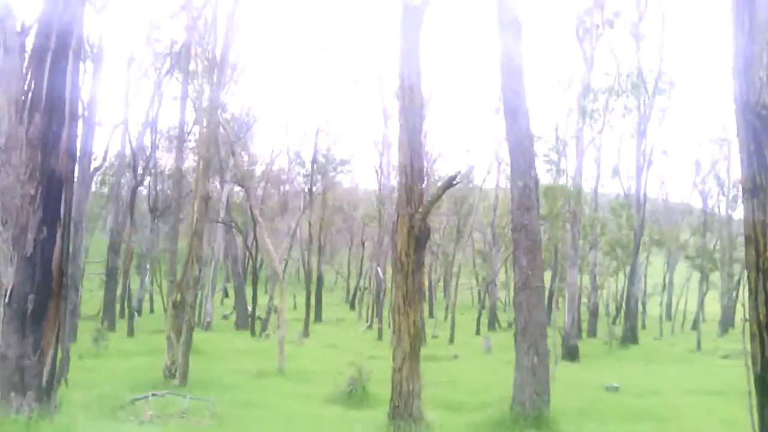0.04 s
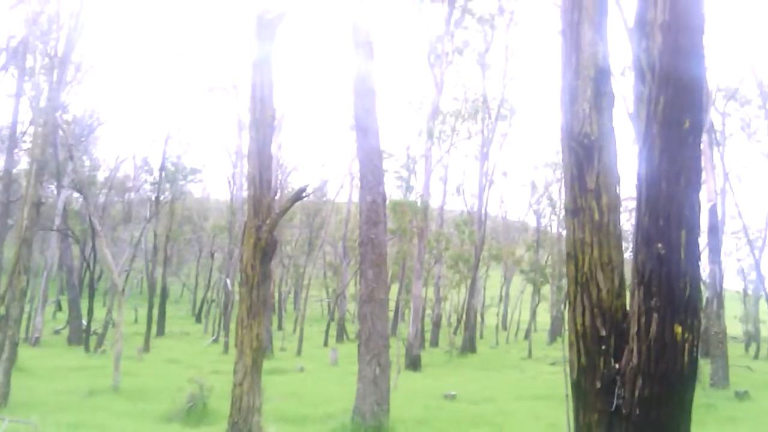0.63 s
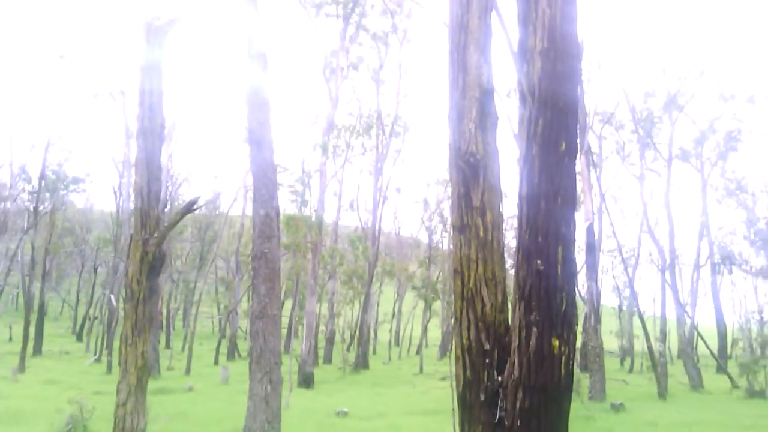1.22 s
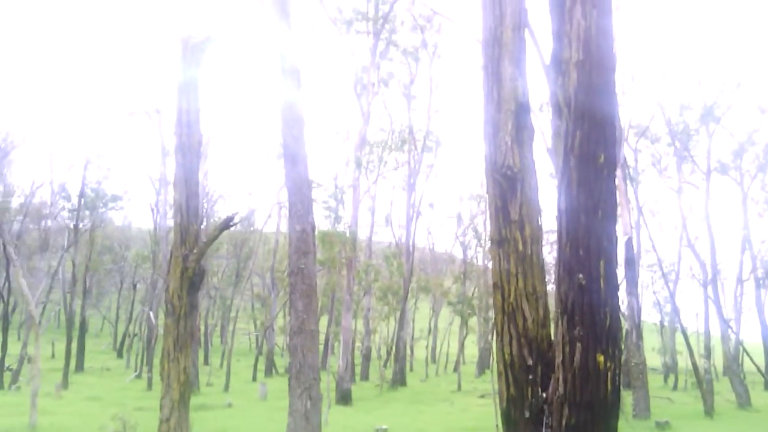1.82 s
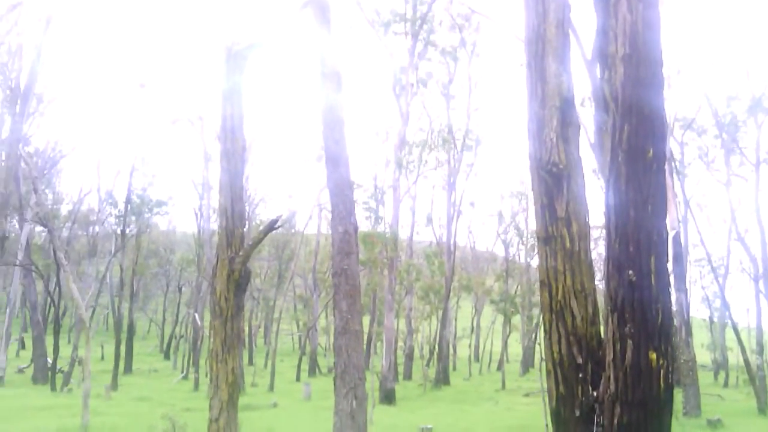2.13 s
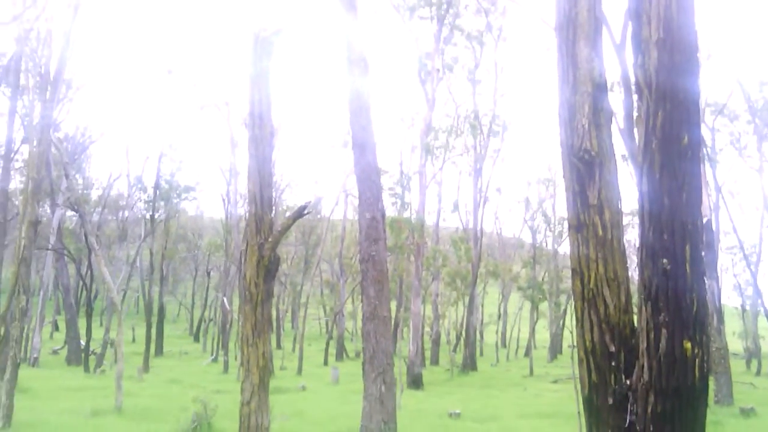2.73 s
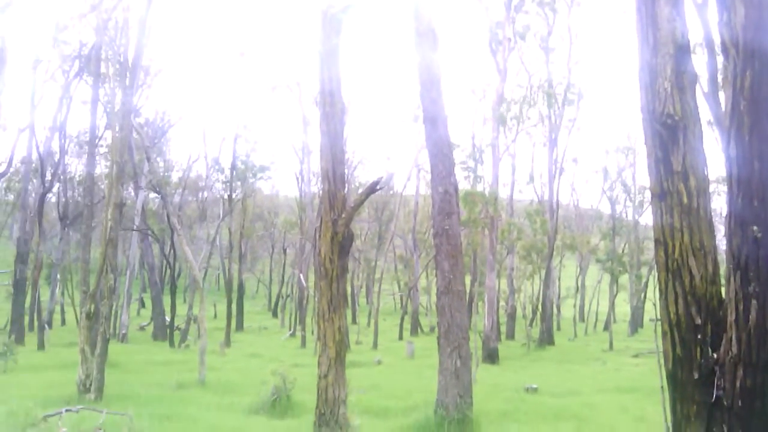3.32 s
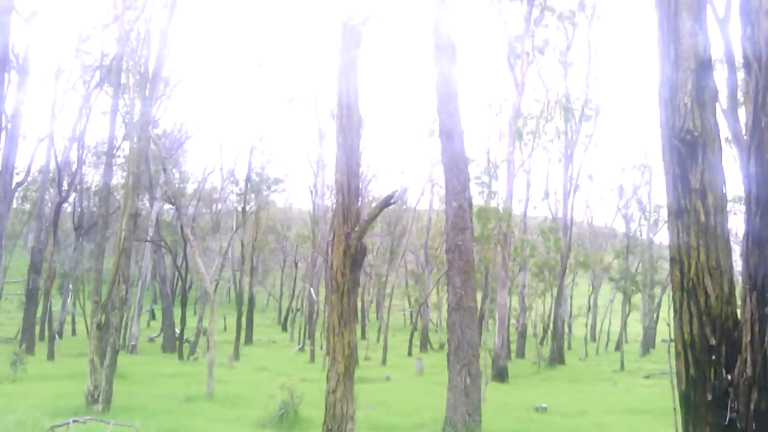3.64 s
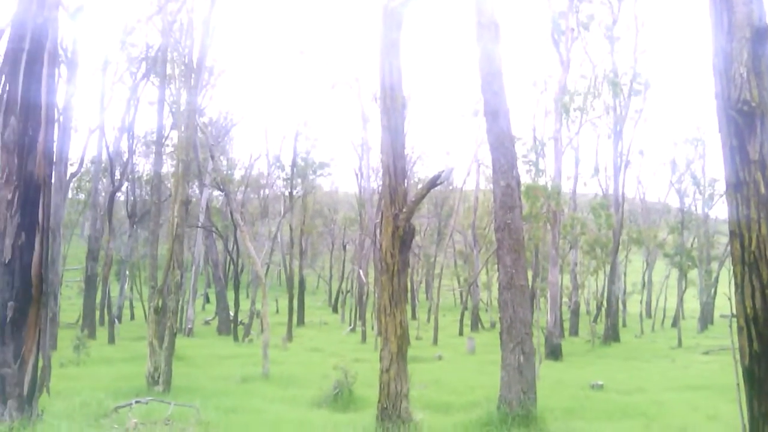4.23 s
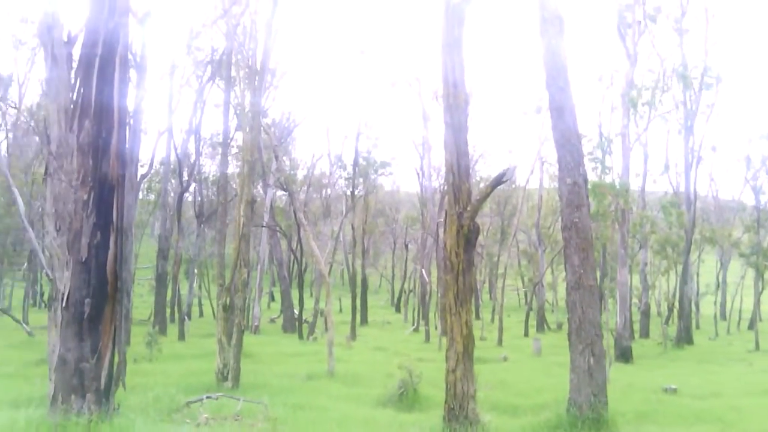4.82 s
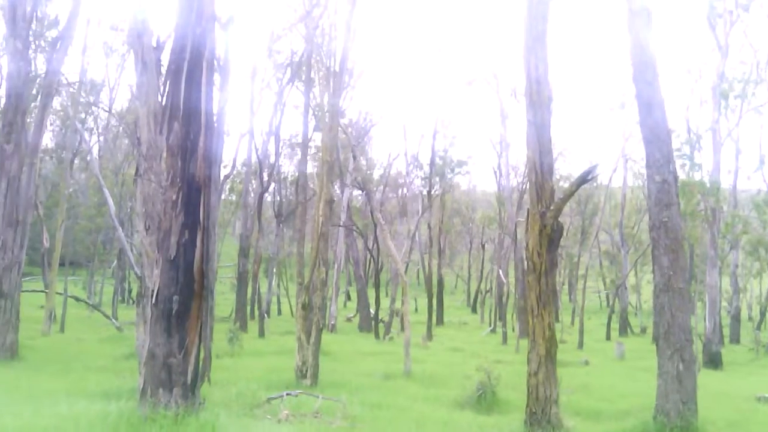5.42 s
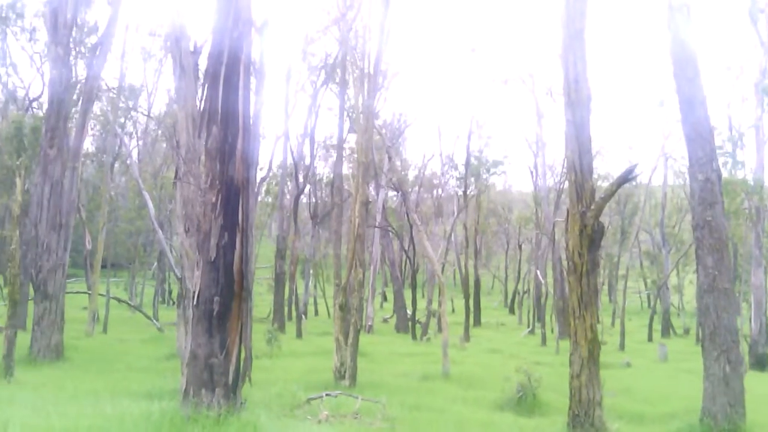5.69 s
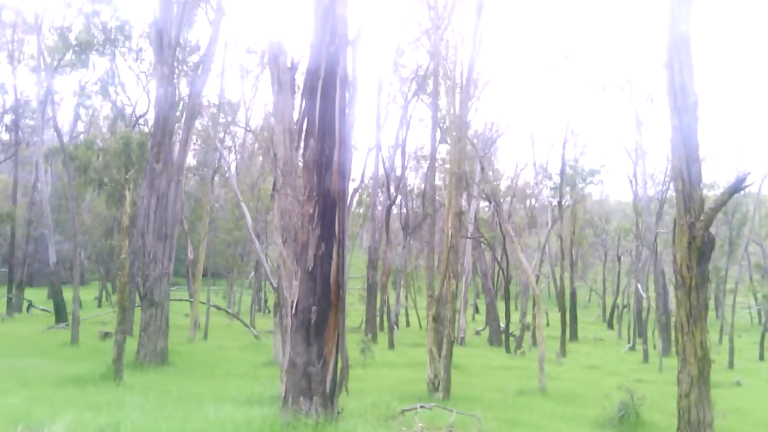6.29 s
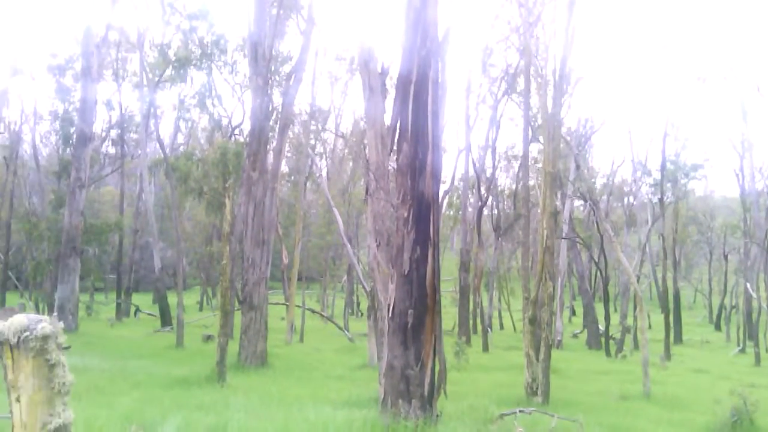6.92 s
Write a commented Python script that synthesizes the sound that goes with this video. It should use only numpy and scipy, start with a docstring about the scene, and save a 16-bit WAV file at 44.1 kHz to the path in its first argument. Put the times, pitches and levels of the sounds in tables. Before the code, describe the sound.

After a brief silence, outdoor woodland sound opens at about 0.6 seconds with a low puff of wind on the microphone and small birds twittering in the distance. High peeps, slurred whistles and quick buzzy trills continue throughout, each with a short wash from the trees. The nearest, clearest calls come around 2.3, 3 and 3.9 seconds. Grass swishes softly close by at about 1.3 and 2.7 seconds, with a few tiny stalk snaps near 2.2 seconds. A breeze rises just before 3 seconds and buffets the microphone hardest between 3.5 and 4 seconds, with low rumbling and dull thumps. Lighter gusts follow near 4.8, 5.5 and 6.4 seconds. The wind eases near 7 seconds as the birds keep chirping and one more stalk ticks. A faint, steady wash of distant leaves lies under everything.

```python
"""Small birds peep, slur and trill in open grassy woodland. Each call is a trembling, nearly pure
syrinx tone; the trunks scatter it into a short wash. Behind them a far flock twitters.
Gusts buffet the single microphone, grass rustles and ticks close by, and distant leaves
lay a soft wash under it all."""
import sys
import numpy as np
from scipy import signal
from scipy.fft import rfft, irfft
from scipy.io import wavfile
from scipy.ndimage import uniform_filter1d

SR = 44100
rng = np.random.default_rng(int(sys.argv[2]) if len(sys.argv) > 2 else 0)


def to_wav(s):
    """Save 16-bit WAV."""
    ch = np.atleast_2d(s).T  # columns
    pcm = np.round(np.clip(ch, -1, 1) * 32767)  # PCM
    wavfile.write(sys.argv[1], SR, pcm.astype(np.int16))


N = 315315
T = np.arange(N) / SR

# Nearest bird's peeps. Each row: start in seconds, length in seconds, level in dB.
PEEPS = [(1.372, 0.059, -23.5), (2.266, 0.044, -18), (2.924, 0.049, -16.5), (3.641, 0.041, -22),
         (3.865, 0.051, -18.5), (5.394, 0.051, -22), (6.41, 0.044, -19)]
# Flat-topped peep contour. Each row: share of the length, pitch in Hz, relative level in dB.
PEEP_SHAPE = [(0, 5010, -22), (0.202, 6180, 0), (.42, 6294, 0.5), (0.798, 6040, -1.5), (0.999, 4580, -8.5)]
# Songs of a squeak and two arches. Each row: start in seconds, squeak level in dB, arch level in dB.
SONGS = [(1.196, -36, -24.5), (3.034, -37, -17.5)]
# A song's arches. Each row: delay in seconds, length in seconds, top pitch in Hz, relative level in dB.
SONG_ARCHES = [(0.033, .07, 5127, -0.5), (0.127, .06, 4840, -4.5)]
# Lone arched notes. Each row: start in seconds, length in seconds, top pitch in Hz, level in dB.
ARCHES = [(1.752, .07, 4620, -28.5), (3.813, 0.045, 7150, -29.5)]
# Down-slurred whistles. Each row: start in seconds, length in seconds, first pitch in Hz, level in dB.
SLURS = [(2.17, 0.015, 6580, -25.5), (3.275, 0.13, 4720, -33.5), (3.42, 0.15, 3690, -42.5),
         (4.035, .225, 4076, -34), (4.107, .042, 6920, -36.5), (4.268, .029, 5850, -24),
         (4.396, .046, 6780, -19.5), (4.43, .078, 4900, -27), (4.877, .11, 6320, -27.5),
         (5.1, 0.12, 4710, -33.5), (5.721, .09, 4600, -37.5), (6.523, 0.1, 3940, -36),
         (6.629, 0.086, 4880, -34), (7.052, .037, 5800, -31)]
# Swoops onto a held note. Each row: start in seconds, length in seconds, held pitch in Hz, level in dB.
SWOOPS = [(1.958, .075, 4497, -25), (5.321, 0.14, 3044, -39.5), (5.557, .16, 2980, -36.5),
          (6.274, 0.18, 5106, -29), (6.668, 0.088, 4960, -30.5), (6.828, 0.19, 3463, -32.5)]
# Quavering slides. Each row: start and length in seconds, first and last pitch in Hz, level in dB.
QUAVERS = [(0.821, 0.097, 4750, 4150, -33), (0.924, 0.12, 3460, 2790, -42.5),
           (1.486, .11, 5650, 4770, -30.5), (1.582, 0.088, 4270, 3660, -32), (2.213, 0.19, 4600, 4210, -31),
           (2.491, 0.17, 5280, 4390, -34), (3.198, 0.096, 4540, 4460, -34.5),
           (3.511, 0.13, 5140, 4870, -35), (3.647, .07, 4740, 3890, -27.5), (3.784, .22, 3547, 4100, -35),
           (4.958, .17, 4770, 4050, -33.5), (5.774, .23, 4710, 4500, -34.5)]
# Buzzy trills. Each row: start and length in seconds, pitch in Hz, swings per second, level in dB.
TRILLS = [(1.795, .11, 3820, 56, -33.5), (2.801, .25, 3850, 65, -31), (3.904, 0.055, 4720, 66, -32.5),
          (6.109, 0.11, 3590, 48, -37), (6.872, 0.12, 5050, 37, -32.5)]
# Reedy chirps. Each row: start in seconds, level in dB.
RASPS = [(4.596, -32.5), (4.72, -30)]
# Far peeps. Each row: start in seconds, level in dB.
FAR_PEEPS = [(.6, -32), (0.802, -28), (.84, -31), (5.55, -29.5), (5.761, -30.5), (5.943, -28), (6.179, -32),
             (6.825, -29)]
# Flock loudness. Each row: time in seconds, level in dB.
FLOCK_LEVELS = [(.62, -36.5), (1.1, -43), (1.4, -33.5), (1.8, -44), (3.1, -38), (4.1, -43), (5.25, -45),
                (5.6, -36), (6.1, -39.5), (7.15, -39)]
# Gusts. Each row: peak time in seconds, half width in seconds, level in dB.
GUSTS = [(.65, 0.094, -33.5), (.81, 0.063, -27.5), (1.24, .1, -31), (3.28, 0.12, -28.5), (3.59, 0.07, -23),
         (3.929, 0.034, -18), (4.82, 0.092, -28), (5.52, 0.069, -29), (6.44, 0.11, -29),
         (6.77, 0.09, -34.5)]
# Eddies thumping the microphone port. Each row: time in seconds, level in dB.
EDDIES = [(0.641, -19), (.732, -19), (2.494, -24.5), (3.42, -18), (3.552, -16), (3.566, -8.5),
          (3.617, -18.5), (3.777, -17.5), (3.913, -14.5), (3.943, -14), (4.268, -19), (4.886, -16),
          (5.526, -17)]
# Grass swishes. Each row: peak time, rise and fall in seconds, level in dB.
SWISHES = [(1.32, 0.089, 0.076, -30), (2.111, 0.044, 0.032, -36), (2.21, 0.028, 0.05, -35),
           (2.706, 0.056, 0.025, -28)]
# Snapping stalks. Each row: start in seconds, level in dB.
SNAPS = [(1.882, -25), (2.203, -22), (2.214, -20), (2.222, -19), (2.345, -24), (3.6, -26), (7.127, -21)]
# Filter curves. Each row: frequency in Hz, gain in dB.
FLOCK_COLOUR = [(2800, -6.5), (3600, -6), (4600, -3.5), (5600, -3), (6250, -1), (6900, -5.5), (8500, 4)]
WIND_COLOUR = [(12, -2.5), (35, 2), (80, 0.5), (190, -16.5), (320, -35), (1800, -79)]
SWISH_COLOUR = [(500, -20), (2300, -9), (3700, -10), (6000, 3.5), (8800, -15), (15000, -25.5)]
SNAP_COLOUR = [(1500, -20), (6800, 2), (9000, -9), (15000, -14)]
LEAVES_COLOUR = [(60, -26), (300, -6), (700, -11), (2000, -14.5), (5000, -19.5), (9000, -19),
                 (15500, -26.5)]
HISS_COLOUR = [(150, -61.5), (1000, -27), (3000, 0), (15000, -11)]


def birds(t60_s=0.83, far_wet=0.63, near_wet=0.5):
    """Direct calls plus their wash; fainter birds are further off, so more arrives scattered."""
    direct, scattered = np.zeros(N), np.zeros(N)
    for start_s, db, call in [*peeps(), *songs(), *whistles(), *trills(), *rasps()]:
        wet = np.interp(db, [-35, -18], [far_wet, near_wet])
        add(direct, start_s, undb(db) * np.sqrt(1 - wet ** 2) * call)
        add(scattered, start_s, undb(db) * wet * call)
    for start_s, db in FAR_PEEPS:
        u = span(0.0546)
        hz = glide(u, 6300, 6200, 5930)
        add(scattered, start_s, undb(db) * syrinx(hz, waver=0.018) * swell(u))
    return direct + trunks(scattered, t60_s, early_db=7.5)


def peeps(afternote_delay_s=.072, afternote_db=-31.5):
    """Flat-topped peeps, each followed by a soft arch. Yields start, level, sound."""
    share, hz, shape_db = np.transpose(PEEP_SHAPE)
    for start_s, length_s, db in PEEPS:
        u = span(length_s)
        yield start_s, db, syrinx(np.interp(u, share, hz)) * undb(np.interp(u, share, shape_db))
        yield start_s + afternote_delay_s, afternote_db, arch(length_s=.052, top_hz=5060)


def songs(squeak_s=.045, squeak_hz=3580, rise_hz=556):
    """Three notes: a thin rising squeak, then two arches."""
    for start_s, squeak_db, arch_db in SONGS:
        u = span(squeak_s)
        yield start_s, squeak_db, syrinx(squeak_hz + rise_hz * u ** 2, octave_db=4) * swell(u)
        for delay_s, length_s, top_hz, relative_db in SONG_ARCHES:
            yield start_s + delay_s, arch_db + relative_db, arch(length_s, top_hz)


def whistles(overshoot=.36, settle_share=0.13, lift=0.0677):
    """Lone arches, half-octave down-slurs, and swoops that settle, then lift slightly."""
    for start_s, length_s, top_hz, db in ARCHES:
        yield start_s, db, arch(length_s, top_hz)
    for start_s, length_s, first_hz, db in SLURS:
        u = span(length_s)
        yield start_s, db, syrinx(first_hz * glide(u, 1, .83, .715)) * swell(u ** 0.43)
    for start_s, length_s, held_hz, db in SWOOPS:
        u = span(length_s)
        hz = held_hz * (1 + overshoot * np.exp(-u / settle_share) + lift * (u - .5))
        yield start_s, db, syrinx(hz) * swell(u ** 0.49)


def trills(sweep_hz_per_s=32500, climb=0.1):
    """Shallow quavers, then wide climbing trills that peak late; slower trills swing wider."""
    for start_s, length_s, first_hz, last_hz, db in QUAVERS:
        u = span(length_s)
        hz = first_hz * (last_hz / first_hz) ** u
        yield start_s, db, warble(u * length_s, hz, swing_hz=164, rate_hz=64) * swell(u)
    for start_s, length_s, middle_hz, rate_hz, db in TRILLS:
        u = span(length_s)
        hz = middle_hz * (1 + climb * (u - .5))
        yield start_s, db, warble(u * length_s, hz, sweep_hz_per_s / rate_hz, rate_hz) * swell(u ** 1.3)


def rasps(length_s=0.052, base_hz=880, rise_hz=340):
    """Reedy chirps: a rising stack of harmonics 3 to 5."""
    for start_s, db in RASPS:
        u = span(length_s)
        stack = sum(syrinx(k * (base_hz + rise_hz * u), waver=0.046) for k in range(3, 6))
        yield start_s, db, stack * swell(u) ** 2 / 2


def arch(length_s, top_hz):
    """A note that rises and drops again, loudest at the top."""
    u = span(length_s)
    return syrinx(glide(u, .7 * top_hz, top_hz, .64 * top_hz)) * swell(u) ** 1.94


def warble(time_s, hz, swing_hz, rate_hz):
    """Pitch flicks up and slides down, loudest on the way down."""
    beat = 2 * np.pi * rate_hz * time_s + 0.876 * walk(49.13, len(time_s))
    return syrinx(hz + swing_hz * np.sin(beat + np.sin(beat) / 2)) * (1 - 0.23 * np.cos(beat))


def syrinx(hz, octave_db=-48, waver=0.0074, flutter_db=2):
    """A tone plus its octave, trembling in pitch and strength."""
    phase = 2 * np.pi * np.cumsum(hz * (1 + waver * walk(350, len(hz)))) / SR
    tone = np.sin(phase) + undb(octave_db) * np.sin(2 * phase)
    return tone * undb(flutter_db * walk(200, len(hz)))


def swell(u):
    """Loudness opens and closes with the air flow."""
    return np.abs(np.sin(np.pi * u)) ** .6


def trunks(x, t60_s, early_db, early_t60_s=.07):
    """Ground and near trunks blur a call at once; farther trees add a faint long wash."""
    time_s = T[:SR]
    fade = undb(-60 * time_s / t60_s) + undb(early_db - 60 * time_s / early_t60_s)
    echoes = rng.standard_normal(SR) * fade
    return signal.fftconvolve(x, echoes / np.linalg.norm(echoes))[:N]


def flock(count=850):
    """Far chirps, heard only through the trees, melt into a twitter."""
    chirps = np.zeros(N)
    for when, length, pitch, bend in rng.random((count, 4)):
        u = span(.02 + 0.043 * length)
        hz = (3100 + 3700 * pitch) * np.exp(.6 * (bend - .4) * (.5 - u))
        add(chirps, when * N / SR, syrinx(hz, waver=0.0195) * swell(u))
    twitter = unit(colour(trunks(chirps, t60_s=1.0, early_db=12.5), FLOCK_COLOUR))
    return twitter * undb(np.interp(T, *np.transpose(FLOCK_LEVELS)))


def wind(breeze_db=-37, flutter_db=5.0, eddy_width_s=0.0017):
    """Turbulence rumbles on the port; eddies pull pressure dips, sharper in stronger wind."""
    strength = wind_strength(breeze_db)
    pressure = noise(WIND_COLOUR) * strength * undb(flutter_db * walk(45))
    for time_s, db in EDDIES:
        force = max(np.interp(time_s, T, strength) / undb(breeze_db), 1)
        offset = (T - time_s) / eddy_width_s * force ** 0.3249
        dip = np.exp(-offset ** 2 / 2) - np.exp(-(offset / 2) ** 2 / 2) / 2
        pressure -= 1.98 * undb(db) * dip
    return pressure


def wind_strength(breeze_db, calm_db=-53.5, from_s=2.87, until_s=6.82, ramp_s=0.16):
    """Near calm, a passing breeze and gusts add in power."""
    blowing = (1 + np.tanh((T - from_s) / ramp_s)) * (1 - np.tanh((T - until_s) / ramp_s)) / 4
    gusts = sum(undb(db) ** 2 * np.exp(-((T - peak_s) / width_s) ** 2) for peak_s, width_s, db in GUSTS)
    return np.sqrt(undb(calm_db) ** 2 + undb(breeze_db) ** 2 * blowing + gusts)


def grass(grain_db=4, tick_count=420, snap_decay_s=.0007):
    """Blades brush in dense grains; stalks snap, with faint ticks between."""
    swishes = sum(undb(db) * np.exp(-((T - peak_s) / np.where(T < peak_s, rise_s, fall_s)) ** 2 / 2)
                  for peak_s, rise_s, fall_s, db in SWISHES)
    brush = unit(colour(rng.standard_normal(N) * undb(grain_db * walk(1500)), SWISH_COLOUR))
    snaps = np.zeros(N)
    fade = np.exp(-T[:SR // 100] / snap_decay_s)
    ticks = [(when * N / SR, -26 - 12 * faintness) for when, faintness in rng.random((tick_count, 2))]
    for start_s, db in SNAPS + ticks:
        add(snaps, start_s, undb(db) * fade * rng.standard_normal(len(fade)))
    return swishes * brush + colour(snaps, SNAP_COLOUR)


def leaves(level_db=-47, lull_db=-0.44, easing_s=(2.7, 3.5)):
    """A soft wash of distant leaves, easing slightly midway."""
    return noise(LEAVES_COLOUR) * undb(level_db + np.interp(T, easing_s, [0, lull_db]))


def whine(rms_db=-65, hz=15305, drift_hz=8):
    """The camera's thin whine."""
    phase = 2 * np.pi * np.cumsum(hz + drift_hz * walk(30)) / SR
    return undb(rms_db) * np.sqrt(2) * np.sin(phase)


def undb(db):
    """Decibels to gain."""
    return 10 ** (np.asarray(db) / 20)


def unit(x):
    """Scale to rms 1."""
    return x / np.sqrt(np.mean(x ** 2))


def colour(x, points):
    """Filter by a curve of (Hz, dB) points."""
    hz, db = np.transpose(points)
    bins_hz = np.maximum(np.fft.rfftfreq(N, 1 / SR), 1)
    return irfft(rfft(x) * undb(np.interp(np.log(bins_hz), np.log(hz), db)), N)


def noise(points):
    """Coloured noise of rms 1."""
    return unit(colour(rng.standard_normal(N), points))


def walk(rate_hz, size=N):
    """Random steps, smoothed twice; spread near 1."""
    hold = max(int(SR / rate_hz), 1)
    steps = np.repeat(rng.standard_normal(size // hold + 2), hold)
    return 1.3 * uniform_filter1d(uniform_filter1d(steps, hold), hold)[:size]


def add(track, start_s, sound):
    """Mix a sound into a track."""
    i = int(np.clip(start_s * SR, 0, N))
    track[i:i + len(sound)] += sound[:N - i]


def span(length_s):
    """Progress u through a note, 0 to 1, per sample."""
    return np.linspace(0, 1, int(length_s * SR))


def glide(u, first, middle, last):
    """A smooth pitch bend through three points."""
    return np.exp(np.polyval(np.polyfit([0, .5, 1], np.log([first, middle, last]), 2), u))


def scene(hiss_db=-58):
    """All sources reach one microphone; each channel adds its own hiss."""
    mono = birds() + flock() + wind() + grass() + whine() + leaves()
    return np.array([mono + undb(hiss_db) * noise(HISS_COLOUR) for _ in range(2)])


def record(dry, start_s=.613, top_hz=15750):
    """The recorder opens after a moment of silence and cuts the top."""
    lowpass = signal.ellip(10, .1, 80, top_hz, fs=SR, output="sos")
    return signal.sosfilt(lowpass, dry * (T >= start_s))


dry = scene()
out = record(dry)
to_wav(out)
```